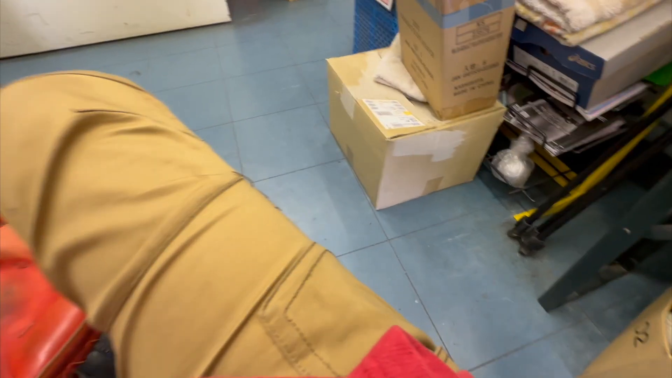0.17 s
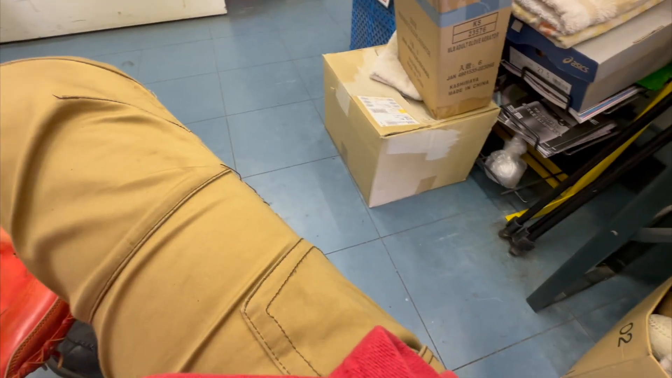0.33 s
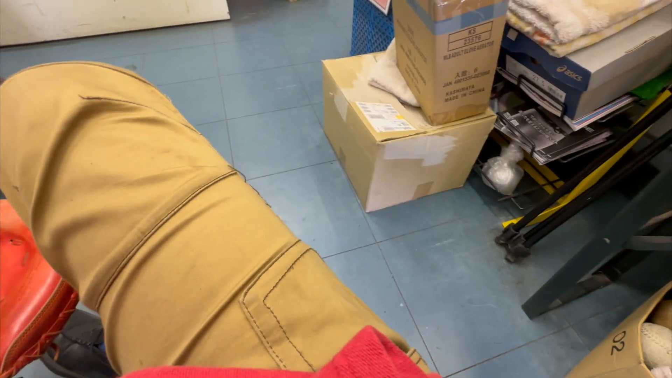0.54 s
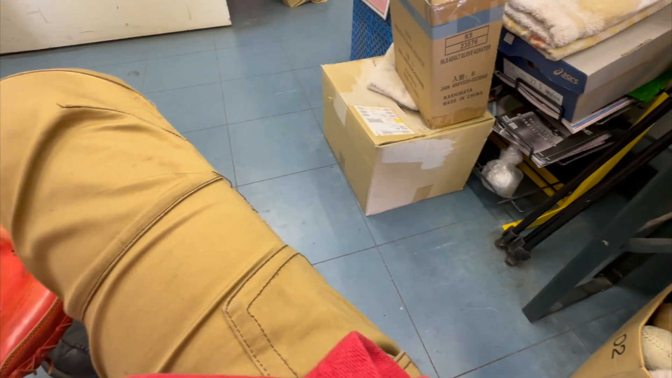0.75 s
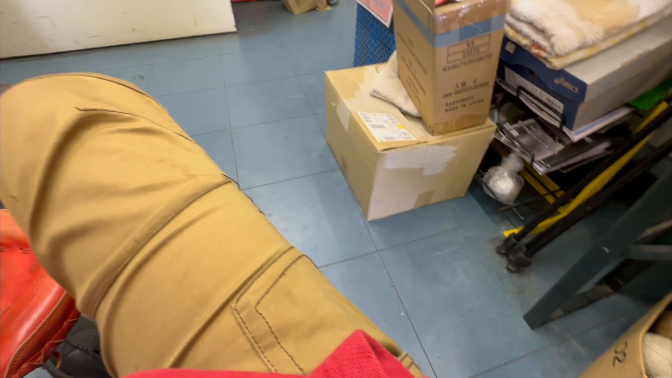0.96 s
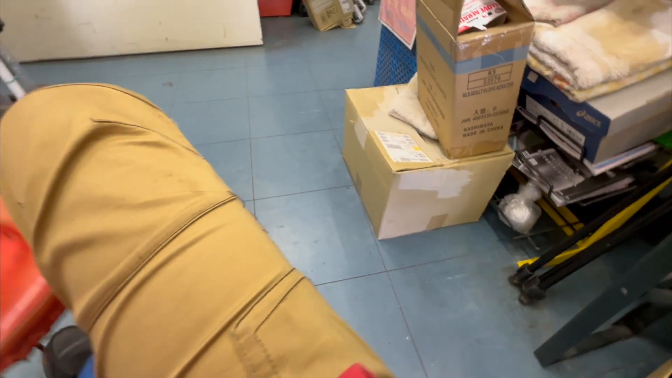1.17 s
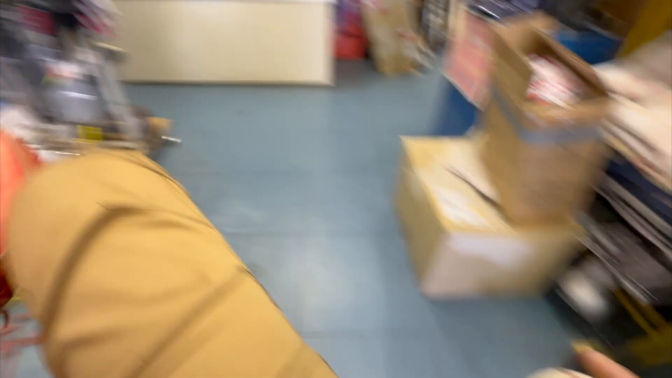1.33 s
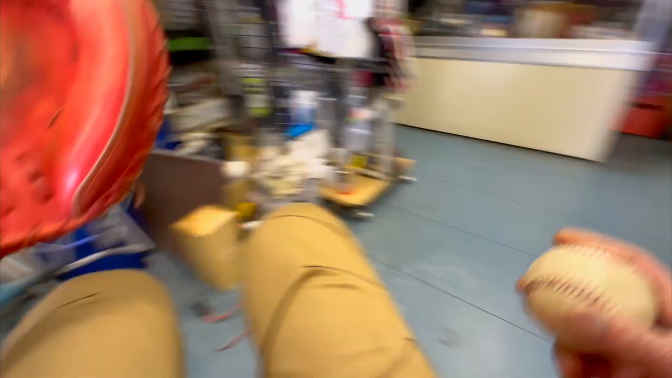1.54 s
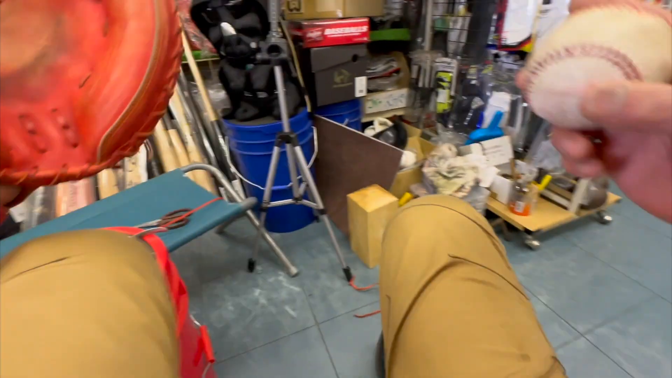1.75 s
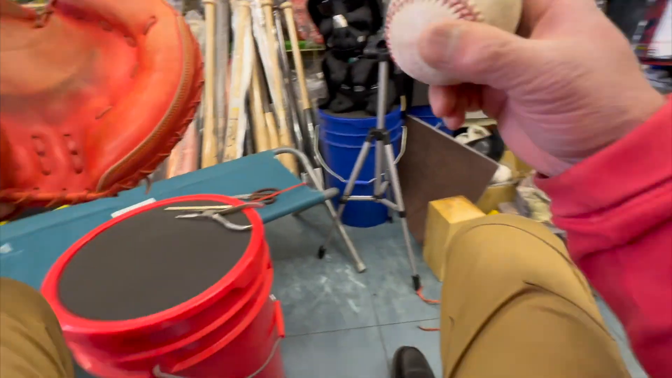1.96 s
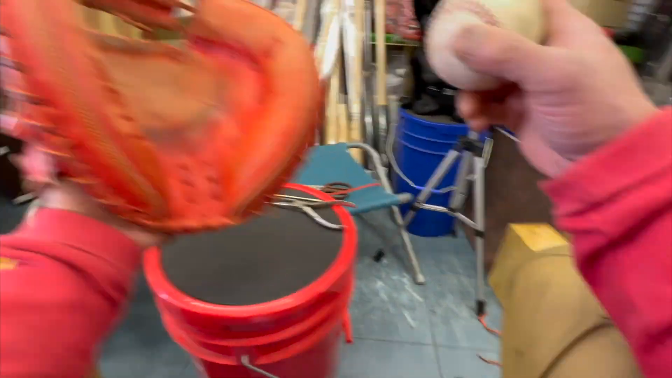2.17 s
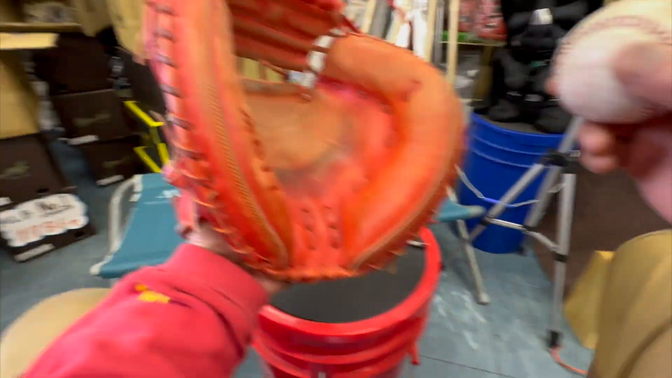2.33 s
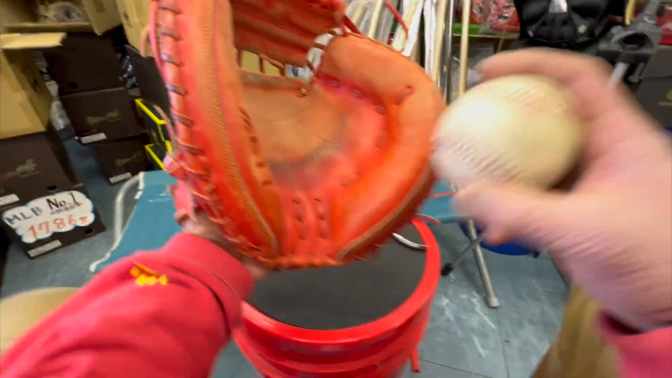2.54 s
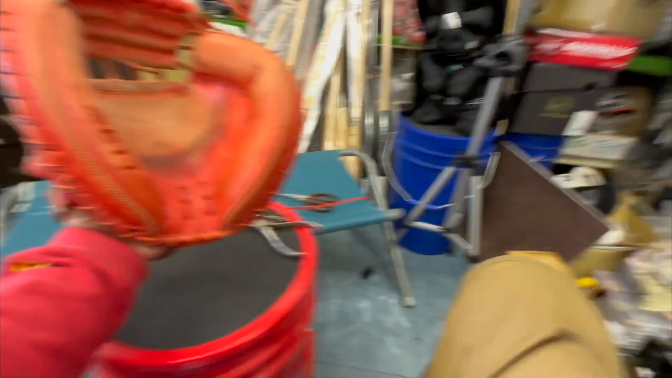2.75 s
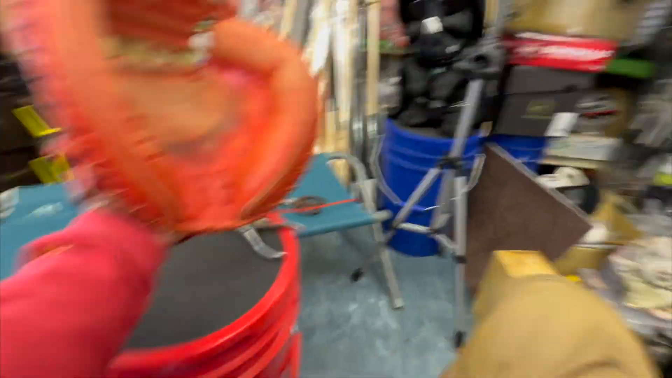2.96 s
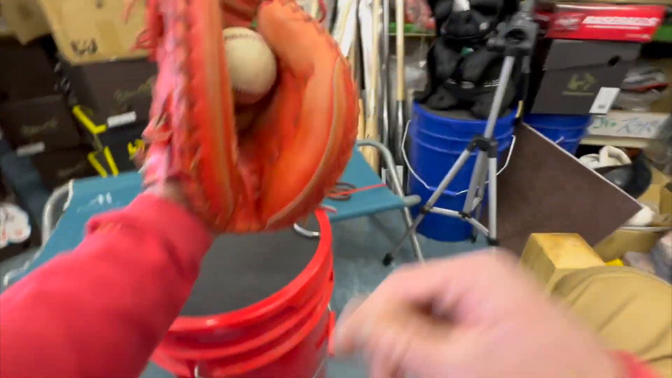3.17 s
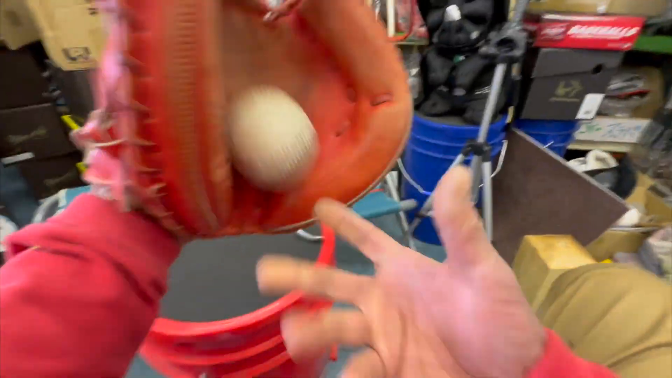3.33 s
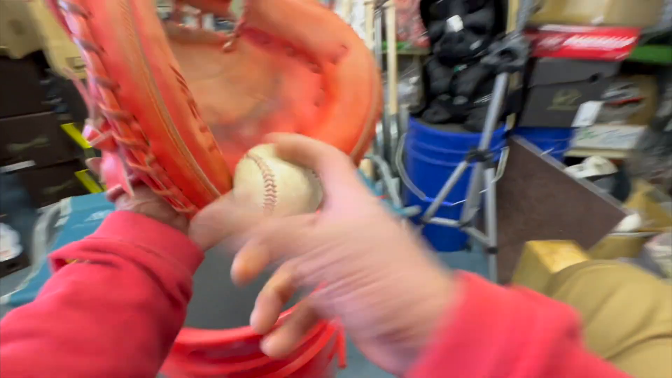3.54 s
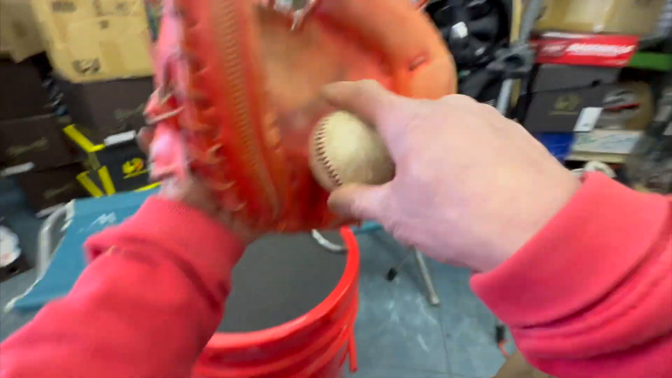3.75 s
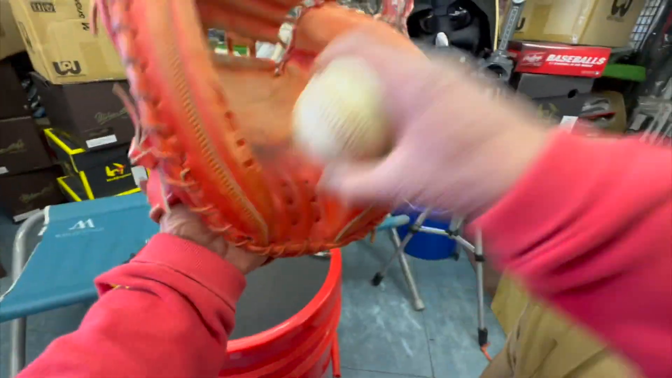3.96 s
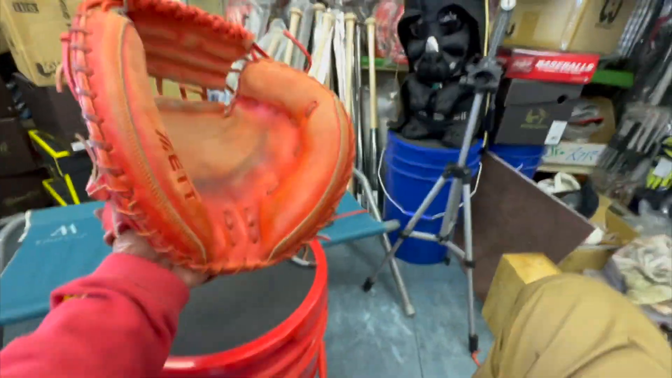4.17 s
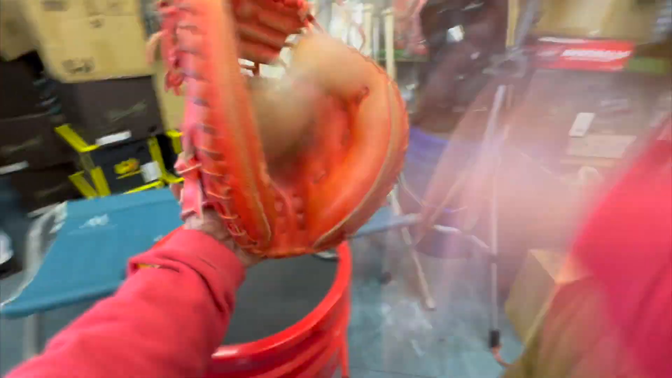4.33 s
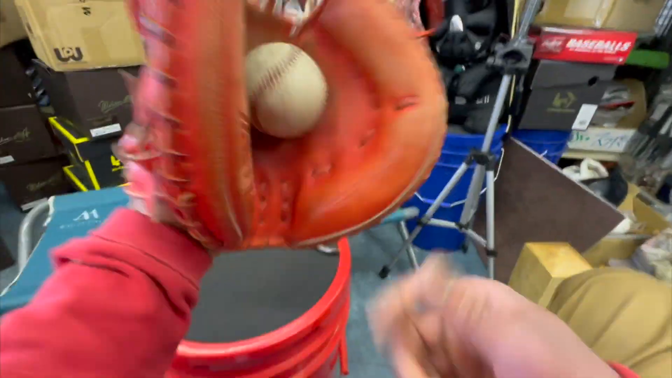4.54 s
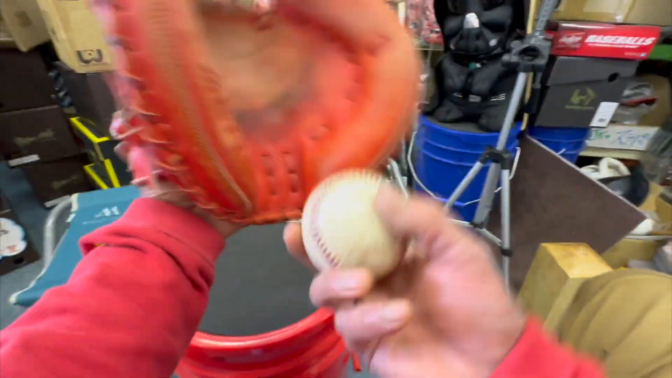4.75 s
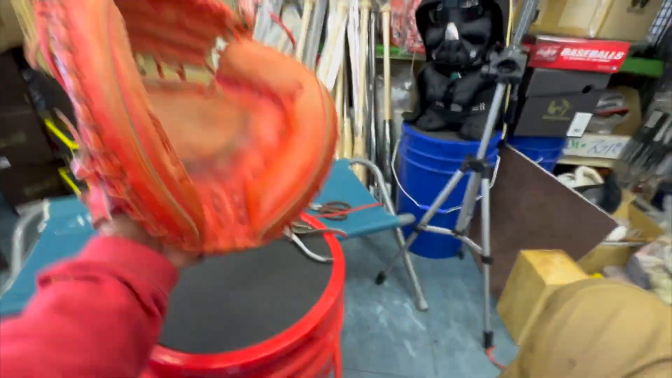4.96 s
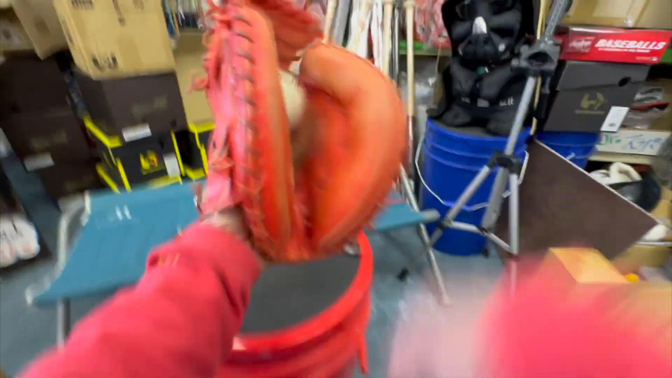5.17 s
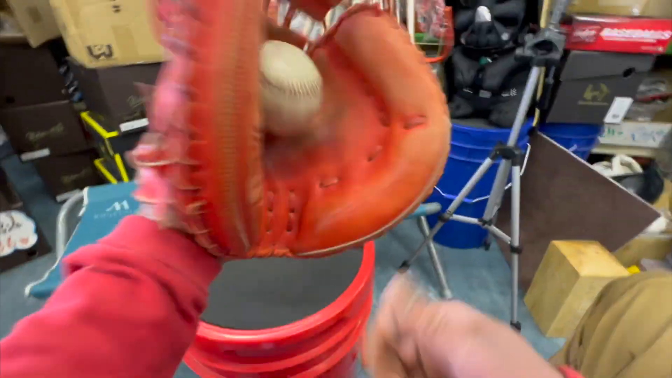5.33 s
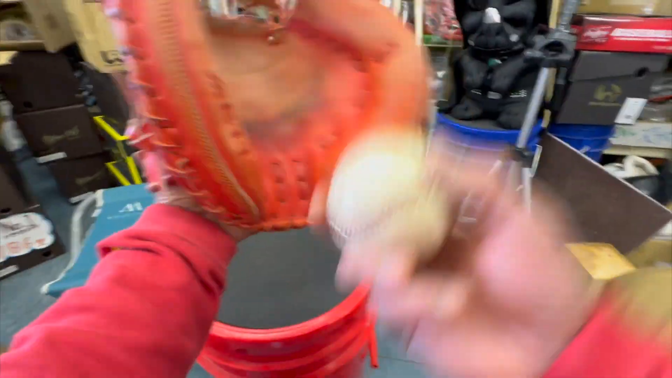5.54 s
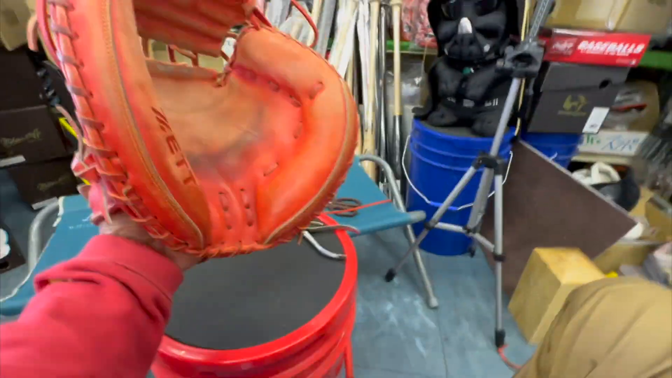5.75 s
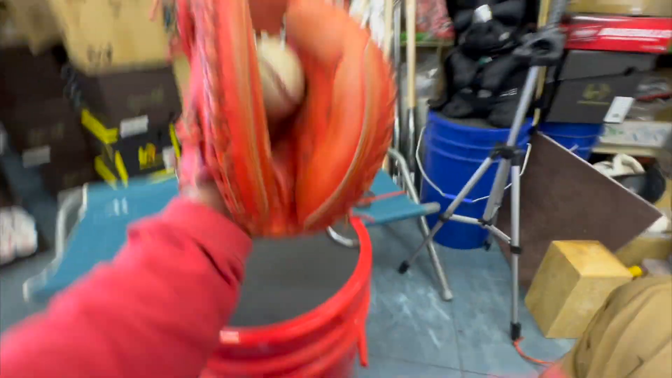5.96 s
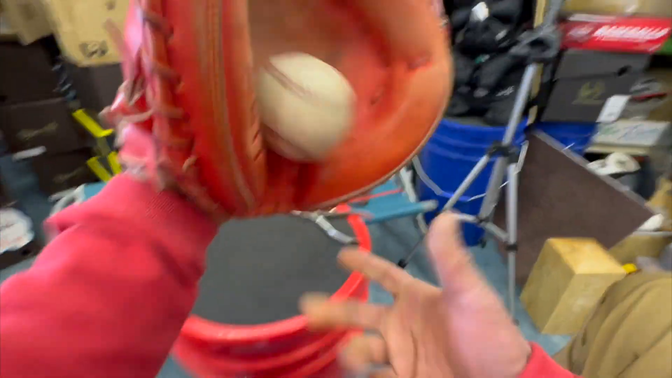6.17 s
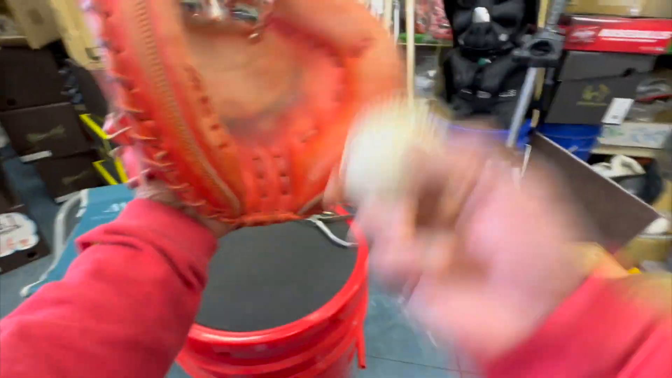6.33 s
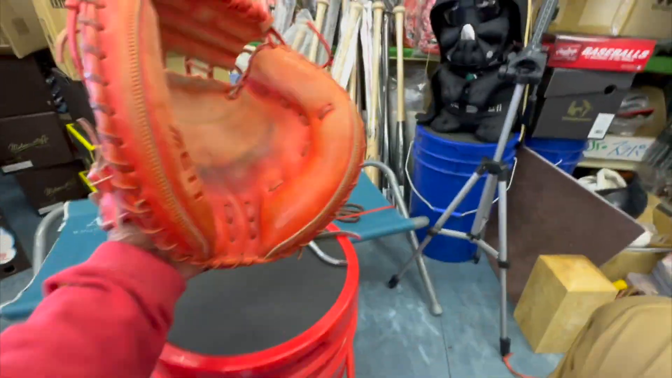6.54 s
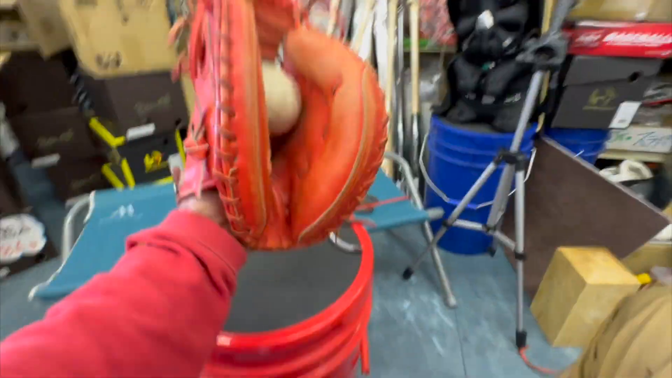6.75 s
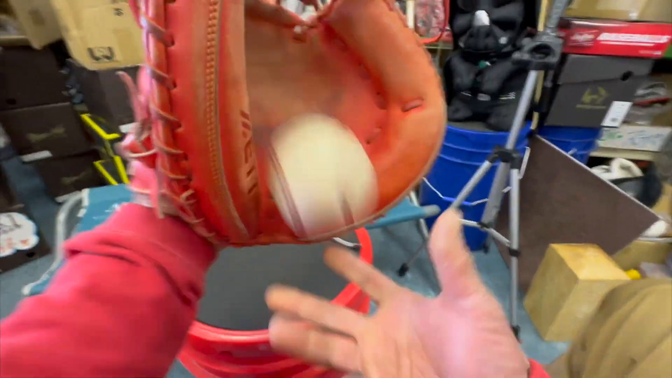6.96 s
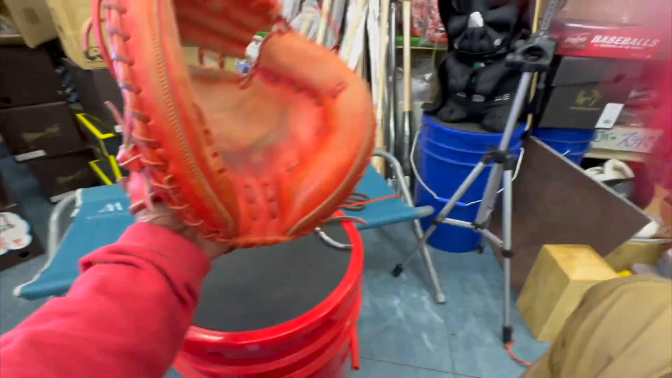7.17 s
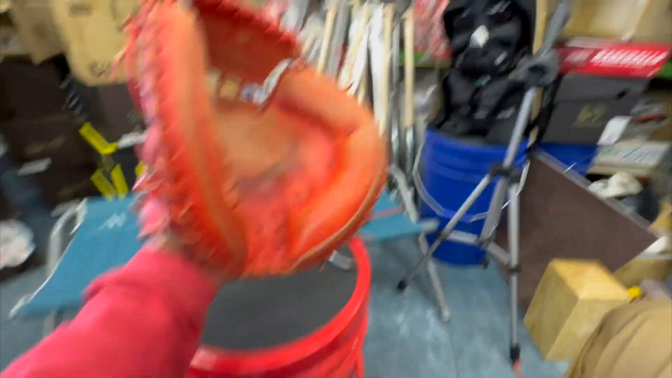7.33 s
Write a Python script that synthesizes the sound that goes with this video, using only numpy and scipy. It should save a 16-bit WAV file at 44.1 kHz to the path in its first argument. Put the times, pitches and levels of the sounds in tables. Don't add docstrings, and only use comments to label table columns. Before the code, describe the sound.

Very close stereo sound in a small cluttered workshop. Quiet sleeve and leather rustle with faint taps comes first, then firmer ball knocks on a mitt. From about three seconds a baseball is thrown into the pocket five times, each a loud, sharp pop with a short leathery ring and arm thump. Between catches, fingers scuff, seams tick and the ball drops softly into a palm.

```python
import sys
import numpy as np
from scipy import signal
from scipy.fft import rfft, irfft, next_fast_len
from scipy.io import wavfile

SR = 44100
rng = np.random.default_rng(int(sys.argv[2]) if len(sys.argv) > 2 else 0)


def unload_audio(sound):
    columns = np.transpose(np.atleast_2d(sound))
    steps = np.round(np.clip(columns, -1, 1) * 32767)
    wavfile.write(sys.argv[1], SR, steps.astype(np.int16))


def field_ratio(decibels):
    return 10 ** (np.asarray(decibels, dtype=float) / 20)


N = 326340


def rms_one(x):
    return x / np.sqrt(np.mean(x ** 2) + 1e-20)


def at_hz(points, hz, column=1):
    points = np.array(points)
    return np.interp(np.log(hz), np.log(points[:, 0]), points[:, column])


def left_right(db):
    return np.array([[db], [-db]]) / 2


def drift(rate_hz):
    r = np.exp(-80 * np.pi * rate_hz / SR)
    slow = signal.lfilter([1], [1, -2 * r, r * r], rng.standard_normal(N // 40 + 2002))[2000:]
    return np.interp(np.arange(N) / 40, np.arange(len(slow)), rms_one(slow))


def bands(white):
    edges_hz = 24 * 2 ** np.arange(0, 9.7, 0.4)
    for k, (low, high) in enumerate(zip(edges_hz, edges_hz[1:])):
        sos = signal.butter(3, [low, high], "band", fs=SR, output="sos")
        yield np.sqrt(low * high), signal.sosfilt(sos, white[k % 2])


def filtered(x, response):
    size = next_fast_len(x.shape[-1] + SR // 4)
    hz = np.maximum(np.arange(size // 2 + 1) * SR / size, 1)
    return irfft(rfft(x, size) * response(hz), size)[..., :x.shape[-1]]


def swells(t, starts, lengths, db, rise, fall):
    t = t[:, None]
    before_s = np.maximum(starts - t, 0)
    after_s = np.maximum(t - starts - lengths, 0)
    return np.sum(field_ratio(db - rise * before_s - fall * after_s) ** 2, axis=1)


# Rumble, leather, sleeve, swish and dry rubbing at rest, in dB.
QUIET_DB = [-58, -60, -63.5, -67.5, -74.5]
RESTLESS_SHARE = [0.32, 0.39, 1.39, 0.5, 0.96]
# time in seconds,
# level in dB.
RESTLESS = [(0, 0.5), (.55, 1.7), (.585, -7), (.655, -9), (.69, 1.5), (1.04, -0.5), (1.15, 9), (2.9, 3.5),
            (3.55, -5), (3.88, 5), (3.94, -1), (4.4, 5.5), (5.3, 3), (5.7, 5), (6.05, -2), (6.4, 6.5),
            (6.85, 1), (7.4, -4)]
# start in seconds, length in seconds, level in dB.
JOLTS = [(0, 0.018, -46), (0.561, 0.017, -54.5), (1.322, 0.014, -40.5), (1.52, .02, -48), (2.162, .02, -50),
         (2.375, 0.32, -56), (3.207, 0.2, -44), (3.598, 0.12, -47), (4.186, 0.072, -50),
         (4.652, 0.025, -46.5), (5.027, 0.016, -41), (5.42, .02, -42), (5.78, 0.041, -47),
         (6.02, 0.057, -42.5), (6.178, 0.07, -44.5), (7.015, 0.024, -57.5), (7.323, 0.024, -50)]
# start in seconds, length in seconds, level in dB.
FLEXES = [(0, 0.088, -46.5), (0.446, 0.017, -48.5), (0.805, 0.16, -50.5), (1.104, .06, -49),
          (1.364, 0.28, -44.5), (1.81, 0.35, -50.5), (2.172, 0.014, -38), (2.299, 0.026, -45.5),
          (2.477, 0.037, -45), (2.667, 0.054, -44.5), (3.281, 0.011, -46.5), (3.403, 0.046, -48),
          (3.6, 0.018, -48), (3.85, .045, -51), (4.25, .015, -46), (4.533, 0.018, -46), (4.735, .02, -53),
          (5.06, 0.023, -49), (5.25, 0.11, -47), (6.07, 0.014, -46.5), (6.286, 0.25, -58.5),
          (6.841, 0.024, -49.5)]
# start in seconds, length in seconds, level in dB, swish over sleeve in dB.
BRUSHES = [(0, 0.23, -58.5, -1.5), (0.38, 0.012, -63.5, 8), (0.46, .065, -66, 8), (0.15, .1, -68, 9),
           (1.13, 0.38, -56.5, -22), (1.52, 0.15, -47, -27), (1.864, 0.026, -51, -15),
           (2.202, 0.029, -49, -32), (2.399, 0.041, -41.5, -11), (2.698, .1, -42, -14),
           (2.922, .07, -58, 6.5), (3.298, 0.012, -50.5, -13.5), (3.584, 0.034, -43.5, -3.5),
           (3.704, 0.021, -46, -21), (4.069, 0.014, -50.5, -17), (4.235, 0.054, -64.5, 5.5),
           (4.67, .02, -52.5, -10), (4.905, 0.056, -50, -14.5), (5.054, 0.026, -52, -25),
           (5.216, 0.014, -49.5, -8.5), (5.69, 0.027, -50.5, -11), (6.192, 0.014, -50.5, -24.5),
           (6.28, 0.018, -64.5, -1), (6.546, 0.023, -53.5, -30), (6.994, 0.014, -52, -25),
           (7.22, 0.037, -52, -8.5)]
# start in seconds, length in seconds, level in dB.
SLIDES = [(.4, 0.14, -63), (1.3, 0.49, -64.5), (1.8, 0.94, -67.5), (2.4, .15, -65), (3.29, 0.014, -61),
          (3.396, 0.029, -52), (3.577, 0.28, -56.5), (4.02, .022, -65), (4.64, 0.081, -62),
          (5.23, .04, -64), (6.09, .02, -68), (5.489, 0.025, -59.5), (6.162, .01, -69), (6.268, .012, -65),
          (6.293, .01, -63), (6.345, 0.028, -62), (6.85, 0.035, -71), (7.026, .02, -63)]
# rise in dB per s, fall in dB per s.
SLOPES = [(230, 249), (110, 106.5), (91, 102.5), (198.6, 200)]
# rise in dB per s, fall in dB per s.
SWISH_SLOPES = (110, 180)
# start in seconds, length in seconds, strength in dB.
THROWS = [(2.979, 0.09, 1.5), (4.286, 0.062, -0.5), (5.092, 0.025, 1), (5.863, 0.035, -0.2),
          (6.634, 0.025, -1.5), (7.393, 0.047, -2)]
# peak in dB, rise in dB per s, fall in dB per s, share of the swing held.
THROW_STIRS = [
    (-30.5, 205, 203.5, .05),
    (-43.5, 98, 117.5, 1),
    (-39, 119, 191.5, 0.8),
    (-44.5, 185, 258.5, 0.88),
    (-55.5, 175.5, 198, .2),
]


def movement():
    t = np.arange(0, N / SR + 0.01, 0.005)
    rest_db = np.interp(t, *np.transpose(RESTLESS))
    throw_s, throw_length, throw_db = np.transpose(THROWS)
    brush_s, brush_length, brush_db, swish_db = np.transpose(BRUSHES)
    gestures = [swells(t, *np.transpose(JOLTS), *SLOPES[0]),
                swells(t, *np.transpose(FLEXES), *SLOPES[1]),
                swells(t, brush_s, brush_length, brush_db, *SLOPES[2]),
                swells(t, brush_s, brush_length, brush_db + swish_db, *SWISH_SLOPES),
                swells(t, *np.transpose(SLIDES), *SLOPES[3])]
    powers = []
    for quiet, share, gesture, stir in zip(QUIET_DB, RESTLESS_SHARE, gestures, THROW_STIRS):
        peak, rise, fall, held = stir
        swing = swells(t, throw_s + throw_length * (1 - held), throw_length * held, throw_db + peak, rise, fall)
        powers.append(field_ratio(quiet + share * rest_db) ** 2 + gesture + swing)
    return t, 10 * np.log10(powers)


LAYER_EDGES_HZ = [170, 1100, 7400]
LAYER_CENTRES_HZ = [80, 550, 720, 2100, 6300, 8400]
# frequency in Hz, level in dB per Hz.
RUSTLE = [(15, -40), (25, -10.5), (64, -1.5), (137, -10.5), (301, -11.5), (640, -13), (900, -17),
          (1400, -14.5), (2300, -12), (4600, -14.5), (6560, -12.5), (9000, -18.5), (11000, -15.5),
          (13000, -66.5), (16000, -63.5)]
# frequency in Hz, left-right likeness.
RUSTLE_LIKENESS = [(60, 0.086), (180, 0.068), (550, -0.076), (1650, -0.23), (4970, -0.02), (15000, 0.62)]
# frequency in Hz, left-right difference in dB.
RUSTLE_BALANCE = [(60, 2.5), (180, -0.5), (550, 0.5), (1650, -1), (4970, 6.5), (15000, -23.5)]


def rustle(patchy_db, grain_db):
    s, levels = movement()
    together = drift(22)
    grain = field_ratio(grain_db * drift(140))
    parts, power = [], np.zeros(4)
    for hz, (mid, side) in bands(rng.standard_normal((2, 2, N))):
        alike = np.clip(at_hz(RUSTLE_LIKENESS, hz), -1, 1)
        pair = np.sqrt(1 + alike) * mid + np.sqrt(1 - alike) * side * [[1], [-1]]
        gain = field_ratio(at_hz(RUSTLE, hz) + patchy_db * (0.32 * together + drift(15)))
        part = gain * field_ratio(left_right(at_hz(RUSTLE_BALANCE, hz))) * pair
        if hz > 1500:
            part = part * grain
        parts.append((hz, part))
        power[np.searchsorted(LAYER_EDGES_HZ, hz)] += np.mean(part ** 2)
    levels = np.transpose(levels[:4]) - 10 * np.log10(power) + 0.17
    layer_shares = np.eye(4)[:, [0, 1, 1, 2, 2, 3]]
    out = 0
    for hz, part in parts:
        weights = [np.interp(np.log(hz), np.log(LAYER_CENTRES_HZ), share) for share in layer_shares]
        out = out + field_ratio(np.interp(np.arange(N) / SR, s, levels @ weights)) * part
    return out


# frequency in Hz, level in dB.
RUBBING_COLOUR = [(3000, -19.5), (6000, -8.5), (10000, -1.5), (13000, -2), (15500, -1.5), (17000, -7)]


def rubbing(grain_db):
    s, (*_, db) = movement()
    mid, side = rng.standard_normal((2, N))
    hiss = filtered(mid + 0.5 * side * [[1], [-1]], lambda hz: field_ratio(at_hz(RUBBING_COLOUR, hz)))
    return field_ratio(np.interp(np.arange(N) / SR, s, db) + 1.5 + grain_db * drift(60)) * rms_one(hiss)


THUMP_HZ, THUMP_T60_S = 72.1, 0.067


def knocks(table, pocket, stiff, knock_db, upper_db, thump_db, ring, contact_s, settle, soft_hz):
    out, t = np.zeros((2, N + SR)), np.arange(SR // 8) / SR
    chances = rng.random((len(table), 2))
    soft = signal.butter(2, min(soft_hz, 0.45 * SR), fs=SR, output="sos")
    for (s, knock, pitch_hz, upper, thump, pan), (late, share) in zip(table, chances):
        modes = [(pitch_hz * m, left, right, t60) for m, left, right, t60 in pocket]
        modes += [(hz, left + upper + upper_db, right + upper + upper_db, t60) for hz, left, right, t60 in stiff]
        body = sum(field_ratio(np.array([[left], [right]]) - 60 * t / (t60 * ring)) * np.sin(2 * np.pi * hz * t)
                   for hz, left, right, t60 in modes)
        body = body * (1 - np.exp(-t / contact_s))
        settle_lag = round((0.00221 + 0.006 * late) * SR)
        body = body + settle * (share - 0.5) * np.roll(body, settle_lag, axis=1)
        body = signal.sosfilt(signal.butter(3, 0.52 * pitch_hz, "high", fs=SR, output="sos"), body)
        body = signal.sosfilt(soft, body)
        push = field_ratio(thump + thump_db - 60 * t / THUMP_T60_S) * np.sin(2 * np.pi * THUMP_HZ * t)
        at = round(s * SR)
        out[:, at:at + len(t)] += field_ratio(left_right(pan)) * (field_ratio(knock + knock_db) * body + push)
    return out[:, :N]


# multiple of the pocket pitch, left in dB, right in dB, t60 in seconds.
POCKET = [(1.0, 5.5, 4.5, 0.014), (.64, -10, -9.5, 0.026), (1.55, -5.5, -6.5, 0.018)]
# frequency in Hz, left in dB, right in dB, t60 in seconds.
UPPER = [(905, 1.5, -3.5, 0.017), (1250, -2, 1, 0.015), (1670, -7.5, -9.5, 0.023),
         (2175, -18.5, -12, 0.013)]
# time in seconds, knock in dB, knock in Hz, upper modes in dB, left-right in dB.
KNOCKS = [(0.046, -40, 348, -12, 9), (0.4, -37.5, 207, -19, -3), (0.697, -29, 310, -9, -6),
          (0.787, -40, 614, 1, -11), (0.811, -43.5, 690, 0, -8), (1.365, -45, 258, -11, 3.5),
          (1.474, -35.5, 191, -30, 4), (2.017, -18.5, 362, -8, 4.5), (2.054, -20, 480, -8, 3.5),
          (2.089, -37.5, 347, 3, -5), (2.475, -12, 372, -8.5, 1), (2.622, -36.5, 223, -1, 3),
          (2.717, -41.5, 227, 7, -10), (3.315, -37, 580, -16, 5), (3.811, -21.5, 410, -14, 1.5),
          (4.553, -41, 590, -8, 6), (4.67, -32.5, 634, -23, -4), (6.569, -39, 274, -25, -7),
          (6.964, -44, 151, -8, 18.5)]


def touches():
    table = [(s, db, hz, upper, db - 19, pan) for s, db, hz, upper, pan in KNOCKS]
    return knocks(table, POCKET, UPPER, knock_db=4, upper_db=2, thump_db=1, ring=0.63,
                  contact_s=0.0006, settle=1.64, soft_hz=1195)


# time in seconds, level in dB, frequency in Hz, t60 in seconds, left-right in dB.
STRUCK = [(3.0748, -1, 1200, 0.02, 2), (3.075, -11, 1049, 0.026, 15), (3.0748, -11, 2025, 0.014, 1.5),
          (3.075, -22.5, 1560, .012, 0), (4.3515, -7, 2180, 0.012, -5), (4.3513, -7, 2470, .009, -10),
          (4.3515, -14.5, 1500, 0.0064, -3), (4.3635, -2, 990, 0.014, 1.5), (4.3635, -10.5, 2230, .007, -6),
          (4.3635, -8, 1310, 0.012, -2), (5.156, 2.5, 1056, 0.015, 9), (5.16, -2.5, 900, .012, 5.5),
          (5.1565, -2, 2200, 0.012, 4.5), (5.156, -8, 2800, 0.011, 2.5), (5.181, -17, 900, 0.011, 0),
          (5.9247, -11, 875, 0.0078, 7), (5.9247, -13, 1295, 0.0052, 2), (5.9247, -22, 2434, .008, -3),
          (5.926, -22, 1793, .01, -8), (6.6938, -8, 1250, 0.011, 0), (6.6938, -6.5, 2430, 0.0093, -11),
          (6.698, -11.5, 880, 0.0116, 7), (6.716, -21, 1600, 0.0099, 0.5), (6.705, -24.5, 1400, 0.013, 1),
          (5.928, -14.5, 1250, .014, 0.5), (3.085, -21, 680, 0.017, -2.5), (4.376, -27.5, 1000, .015, 0.5),
          (2.476, -19.5, 780, .015, 2), (2.7185, -39, 1500, .006, 0), (2.4, -38, 1100, .008, 4),
          (7.018, -32.5, 720, .015, 0), (0.806, -46, 1350, .06, -3), (0.806, -49, 1080, .05, -3),
          (0.075, -43, 600, .03, 3), (3.38, -34, 700, .02, 3), (6.6986, -10, 620, .016, 8),
          (3.081, -11, 640, .014, 9), (5.9298, -14, 640, .009, 5), (4.352, -8, 2700, .008, -4),
          (3.119, -27, 950, .02, 0), (3.6, -42, 1100, .05, 0), (5.1632, -7, 660, .016, 6),
          (2.314, -33, 380, .08, 5), (3.811, -34, 1200, .012, 0)]


def struck(contact_s):
    out, t = np.zeros((2, N)), np.arange(SR // 20) / SR
    for s, db, hz, t60, pan in STRUCK:
        ring = field_ratio(db + left_right(pan) - 60 * t / t60) * np.sin(2 * np.pi * hz * t)
        at = round(s * SR)
        out[:, at:at + len(t)] += (1 - np.exp(-t / contact_s)) * ring
    return out


# frequency in Hz, width in Hz, left in dB, right in dB.
SQUEEZE = [(6200, 4700, -9, -13), (9420, 110, -10.5, 4)]


def cracks(table, spectrum, level_db, lead_db, lead_s, fall_s, peak_db):
    out, lead = np.zeros((2, N + SR)), SR // 40
    t = (np.arange(SR // 16) - lead) / SR
    air = rng.standard_normal((len(table), 3, len(t)))
    swell = (t < 0) * np.exp(np.minimum(t, 0) / lead_s)
    fall = (t >= 0) * np.exp(-np.maximum(t, 0) / fall_s)

    def whistle(hz):
        return sum(field_ratio(np.array([[left], [right]]) + lead_db) / (1 + (2 * (hz - centre) / width) ** 2)
                   for centre, width, left, right in SQUEEZE)

    for (s, db, loudest_hz, pan, bright), noise in zip(table, air):
        def colour(hz):
            sides = np.array([at_hz(spectrum, hz), at_hz(spectrum, hz, column=2)])
            tilt = bright * np.log2(hz / 4000)
            peak = peak_db * np.exp(-(np.log(hz / loudest_hz) / 0.36) ** 2)
            return field_ratio(sides + tilt + peak - 40 * (hz < 900))
        pair = noise[0] + 0.5 * noise[1:]
        burst = filtered(fall * pair, colour) + filtered(swell * pair, whistle)
        at = round(s * SR) - lead
        out[:, at:at + len(t)] += field_ratio(db + level_db + left_right(pan)) * burst
    return out[:, :N]


def tilted(table):
    return [(*row, 2.5 * np.log2(row[2] / 6000)) for row in table]


# frequency in Hz, left in dB, right in dB.
CRACK = [(1200, 0, -6.5), (2130, -3.5, -19), (3900, -5, 2), (6400, 0, -2), (8200, -19, -6.5),
         (12300, -11.5, -11), (16260, -16, -17)]
# time in seconds, level in dB, loudest frequency in Hz, left-right in dB.
SCUFFS = [(0.37, -55, 9200, -3), (0.786, -47, 8800, -5), (0.808, -53, 3000, 0), (2.998, -36, 5500, 0),
          (3.005, -40, 4400, -3), (4.55, -49, 9800, -1), (4.634, -47, 13000, 0), (4.68, -44, 9000, 0),
          (4.722, -51, 11000, 0), (6.19, -50, 4500, 5), (6.265, -47, 10000, -3), (2.092, -46, 1540, 5),
          (2.155, -51.5, 1000, 0), (3.82, -53, 2500, 0), (3.735, -48, 4800, 0), (5.066, -39, 6500, -6.5),
          (6.963, -49, 2900, 11), (6.625, -44, 8900, -6.5), (3.42, -51, 10800, 0), (7.025, -51, 9500, -3)]


def scuffs():
    return cracks(tilted(SCUFFS), CRACK, level_db=4.5, lead_db=-27, lead_s=0.003, fall_s=0.009, peak_db=8)


# time in seconds, level in dB, loudest frequency in Hz, left-right in dB.
TICKS = [(0.7877, -47, 9300, -3), (0.81, -47, 2840, 0), (1.3229, -42, 8050, -3), (2.0555, -38, 1800, 4),
         (2.0899, -43, 1550, 9), (2.475, -47, 1540, 12), (2.6228, -39.5, 1520, 11.5),
         (2.718, -35, 1530, -2), (3.375, -38.5, 8900, 1), (3.707, -39.5, 1710, 10), (3.8097, -37, 2000, 0),
         (4.078, -51, 5000, 0), (4.6247, -44, 4060, 14), (4.672, -34.5, 8200, 0), (4.698, -32.5, 10200, 0),
         (4.725, -48, 3910, -8), (4.8678, -49, 1990, -1.5), (5.065, -32, 4410, 1), (5.436, -49, 4340, 13),
         (5.475, -29, 7340, -5), (6.17, -42, 10900, -2), (6.1758, -39, 4420, 8), (6.1846, -44.5, 1610, 10),
         (6.2477, -36, 6400, -7), (6.2614, -36, 6960, -12), (6.2861, -34, 10700, -7.5),
         (6.6175, -34.5, 5500, -3), (6.9604, -49, 3860, 18), (7.014, -46, 6650, -11),
         (7.0175, -28.5, 7750, 3.5)]


def ticks():
    return cracks(tilted(TICKS), CRACK, level_db=4.5, lead_db=-26, lead_s=0.001, fall_s=0.003, peak_db=9.5)


# time in seconds, knock in dB, knock in Hz, thump over knock in dB, left-right in dB.
DROPS = [(1.323, -46.5, 204, 21, 12), (1.55, -32.5, 466, -1.5, 6), (2.308, -19.5, 224, -7, 8.5),
         (2.559, -37, 327, 0, 4), (3.381, -31, 215, -3, 5), (3.442, -32, 233, -4.5, 0),
         (3.707, -42, 163, -14, 20), (4.699, -31, 228, -6, -0.5), (5.035, -43.5, 172, -12, -15.5),
         (5.067, -32, 269, -5, 1.5), (5.451, -40.5, 180, 10, 18), (5.478, -32, 155, 7.5, -6),
         (6.17, -48, 162, 11.5, 20), (6.248, -32.5, 323, -11, 3.5), (6.284, -45, 180, 5, 4),
         (6.864, -40, 843, -6, 10), (7.016, -37.5, 190.6, 12, -2.5)]


def drops():
    table = [(s, db, hz, -16, db + thump, pan) for s, db, hz, thump, pan in DROPS]
    return knocks(table, POCKET, UPPER, knock_db=3, upper_db=-1.5, thump_db=0, ring=0.95,
                  contact_s=0.0011, settle=1.8, soft_hz=900)


# frequency in Hz, left in dB, right in dB.
POP = [(1200, -9, 4.5), (2300, 4.5, -5), (3970, -11, -1), (6400, -2, -8), (8800, -23.5, -7),
       (12300, -12.5, -13.5), (16500, -17, -19.5)]
# time in seconds, level in dB, loudest frequency in Hz, left-right in dB, brightness in dB per octave.
CRACKS = [(3.0745, -7, 4280, -4, -1.5), (4.3515, -10.5, 8860, 1, 4.5), (4.3635, -2, 2390, 1, 1.5),
          (5.156, -6.5, 5600, 3, 0.5), (5.9248, -4.5, 6200, -2, 2.5), (6.694, -4.5, 8800, -2.5, 2)]


def pops():
    return cracks(CRACKS, POP, level_db=6.5, lead_db=-5, lead_s=0.005, fall_s=0.0012, peak_db=2)


# multiple of the pocket pitch, left in dB, right in dB, t60 in seconds.
DEEP_POCKET = [(0.94, 5.5, 4.5, 0.016), (.64, -13.5, -9, 0.03)]
# time in seconds, pocket in dB, pocket in Hz, thump over pocket in dB, left-right in dB.
CATCHES = [(3.066, -28.5, 328, -9.5, -1), (3.0756, -4.5, 398.4, -29, 4.5), (3.083, -18.5, 399, -25, 1.5),
           (3.09, -23.5, 333, -18.5, 2), (4.345, -34.5, 329, 4, -5.5), (4.3517, -3.5, 690, -26, 7.5),
           (4.357, -10.5, 281, -10.5, 2.5), (4.3573, -11.5, 620, -21, 1), (4.364, -6, 380, -19, -0.5),
           (5.15, -18, 792, -28.5, -0.5), (5.1559, -4, 428, -19, 3), (5.16, -8, 680, -22, 5.5),
           (5.914, -29, 454, -18, -2), (5.9253, -5.5, 600, -25.5, 2.5), (5.938, -26, 866, -19.5, 7),
           (6.685, -30, 495, -4.5, 0), (6.6945, -3, 635, -22.5, 1), (6.705, -23.5, 794, -16, 7)]


def catches():
    table = [(s, db, hz, 0, db + thump, pan) for s, db, hz, thump, pan in CATCHES]
    return knocks(table, DEEP_POCKET, [], knock_db=12.5, upper_db=0, thump_db=10.5, ring=0.58,
                  contact_s=0.00097, settle=0, soft_hz=6000)


# time in seconds, level in dB, loudest frequency in Hz.
SHUDDERS = [(3.082, -20, 600), (4.371, -27, 700), (5.165, -27, 700), (5.934, -28.5, 900),
            (6.702, -30, 1050)]
SHUDDER_T60_S, SHUDDER_OCTAVES, SHUDDER_GRAIN_DB = 0.2, 1.35, 4.5


def shudders():
    out, t = np.zeros((2, N)), np.arange(SR // 4) / SR
    for s, db, loudest_hz in SHUDDERS:
        noise = rng.standard_normal((3, len(t))) * field_ratio(SHUDDER_GRAIN_DB * drift(90)[:len(t)])
        pair = noise[0] + 1.1 * noise[1:]
        grains = rms_one(filtered(pair, lambda hz: np.exp(-(np.log2(hz / loudest_hz) / SHUDDER_OCTAVES) ** 2)))
        at = round(s * SR)
        out[:, at:at + len(t)] += field_ratio(db - 60 * t / SHUDDER_T60_S) * np.minimum(t / 0.002, 1) * grains
    return out


RIGHT_LAG_S, LAG_FADES_HZ = 0.00012, 5300
SHADOW_LAG_S, SHADOW_HZ = 0.00015, 620


def right_lag(hz):
    direct_s = RIGHT_LAG_S / (1 + (hz / LAG_FADES_HZ) ** 4)
    shadow_s = SHADOW_LAG_S * np.exp(-(np.log2(hz / SHADOW_HZ) / 0.6) ** 2)
    return np.exp(-2j * np.pi * hz * (direct_s + shadow_s))


# frequency in Hz, level in dB, t60 in seconds.
ROOM = [(60.3, -39.5, 0.36), (159, -17, 0.12), (408, -26, 0.16), (1000, -22.5, 0.19), (2150, -30.5, 0.21),
        (3700, -25, 0.16), (7900, -28.5, 0.18), (15000, -59, 0.22)]
# delay in seconds, level in dB.
WALL_ECHO = (0.02, -36)


def workshop(x):
    t, out, step = np.arange(SR // 3) / SR, np.zeros((2, N + SR)), N // 10
    echo = sum(field_ratio(at_hz(ROOM, hz) - 60 * t / at_hz(ROOM, hz, column=2)) * band
               for hz, band in bands(rng.standard_normal((2, 10, 2, len(t)))))
    echo = echo * np.clip((t - 0.005) / 0.002, 0, 1) * field_ratio(-13)
    echo[..., round(WALL_ECHO[0] * SR)] += field_ratio(WALL_ECHO[1])
    for at, paths in zip(range(0, N, step), echo):
        out[:, at:at + step + len(t) - 1] += signal.fftconvolve(x[:, at:at + step], paths, axes=1)
    return out[:, :N]


def scene():
    hits = touches() + struck(contact_s=0.00033) + scuffs() + ticks() + drops() + pops() + catches()
    hits[1] = filtered(hits[1], right_lag)
    friction = rustle(patchy_db=2.5, grain_db=-1.5) + rubbing(grain_db=1.5)
    return hits + workshop(hits) + shudders() + friction


# frequency in Hz, width in Hz, level in dB.
PORTS = [(5220, 130, -10), (7420, 270, -11.5), (8880, 850, 7), (9600, 160, -4), (9770, 440, 0.5)]
BASS_CUT_HZ = 40
SMEAR_CYCLES = 0.85


def microphones(hz):
    colour_db = sum(db / (1 + (2 * (hz - centre) / width) ** 2) for centre, width, db in PORTS)
    bass_cut = 1 / np.sqrt(1 + (BASS_CUT_HZ / hz) ** 6)
    return field_ratio(colour_db) * bass_cut * np.exp(-2j * np.pi * SMEAR_CYCLES * np.log(hz + 10))


def low_pass(x):
    return signal.sosfilt(signal.butter(12, 16480, fs=SR, output="sos"), x)


KNEE, CUTOFF_HZ = 16, 16450


def record(dry):
    x = filtered(dry, microphones)
    x = x / (1 + np.abs(x) ** KNEE) ** (1 / KNEE)
    x = signal.sosfilt(signal.cheby2(10, 60, CUTOFF_HZ, fs=SR, output="sos"), x)
    mix = np.clip(x * field_ratio(0.2), -1, 1)
    return low_pass(mix)


dry = scene()
out = record(dry)
unload_audio(out)
```